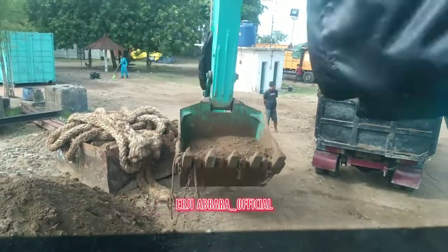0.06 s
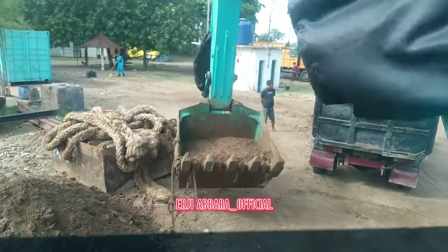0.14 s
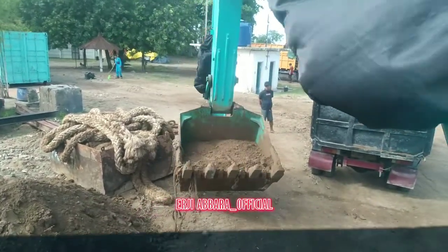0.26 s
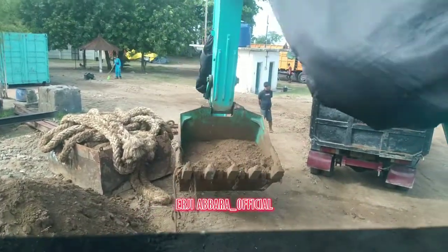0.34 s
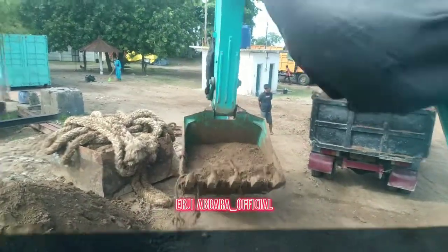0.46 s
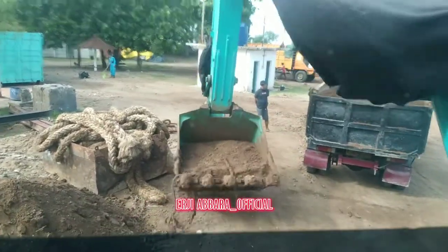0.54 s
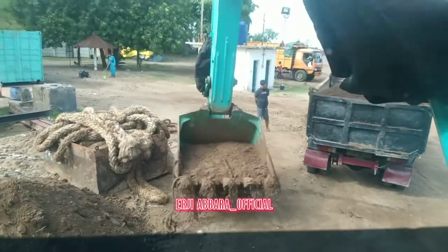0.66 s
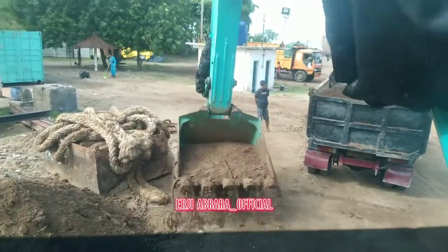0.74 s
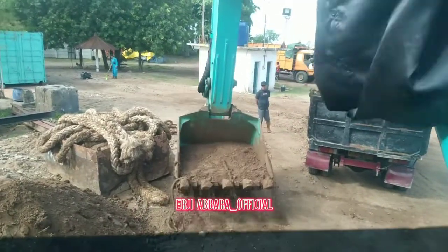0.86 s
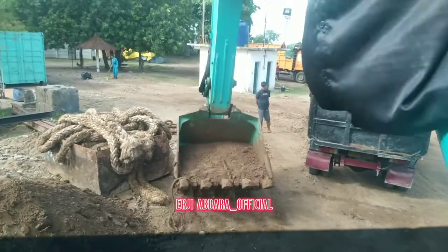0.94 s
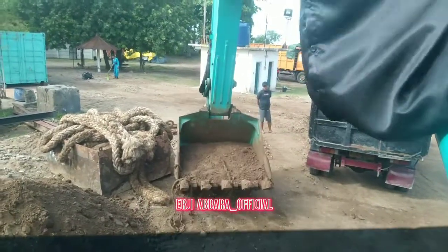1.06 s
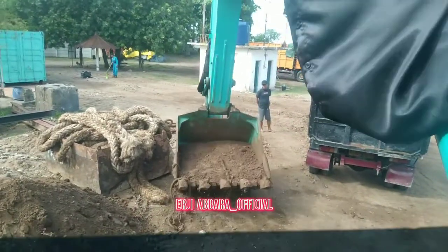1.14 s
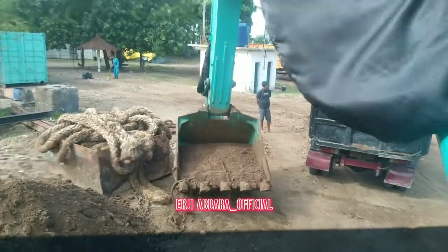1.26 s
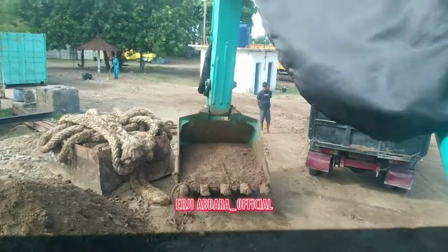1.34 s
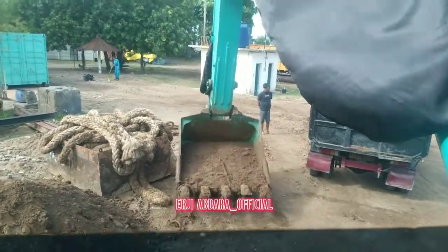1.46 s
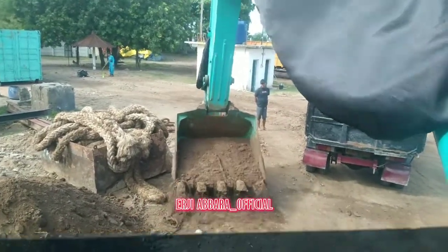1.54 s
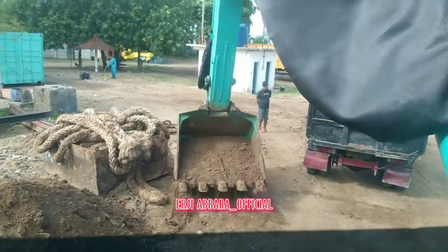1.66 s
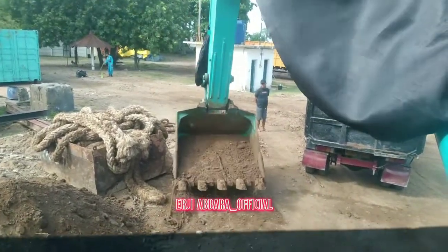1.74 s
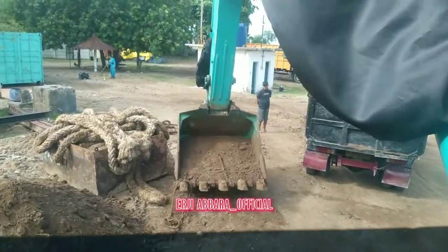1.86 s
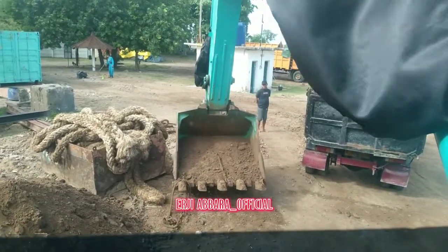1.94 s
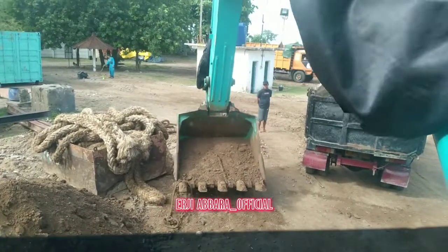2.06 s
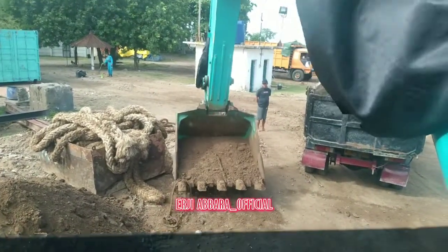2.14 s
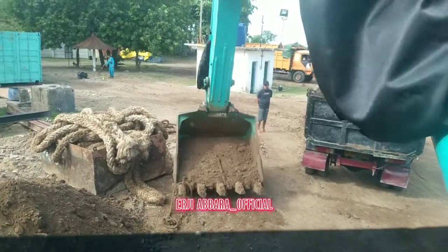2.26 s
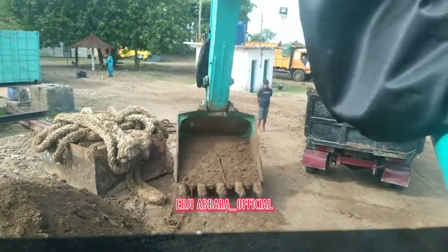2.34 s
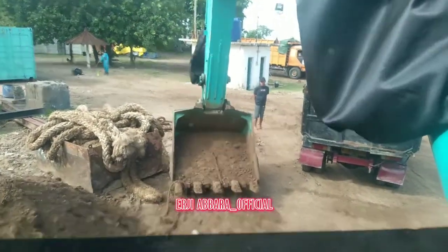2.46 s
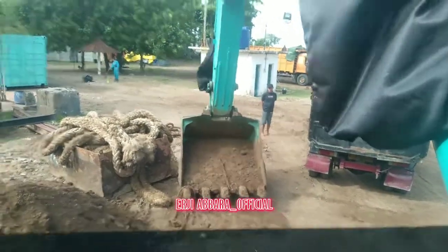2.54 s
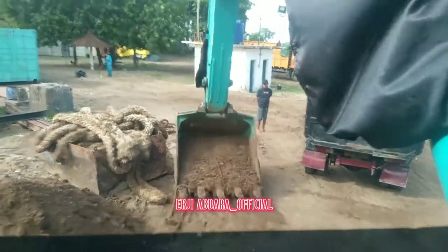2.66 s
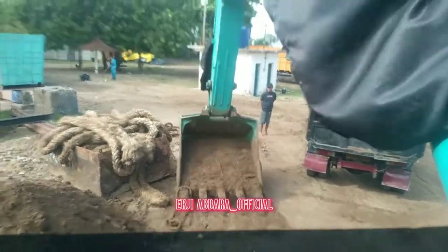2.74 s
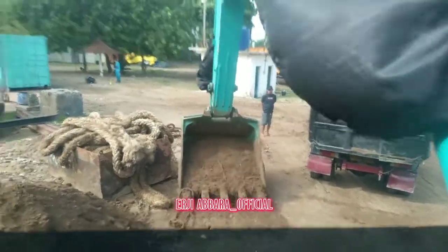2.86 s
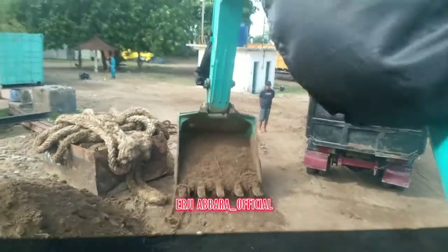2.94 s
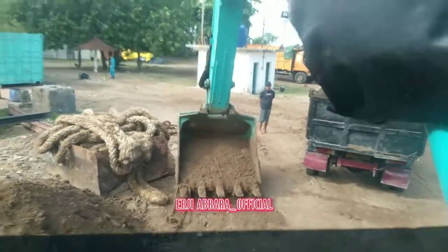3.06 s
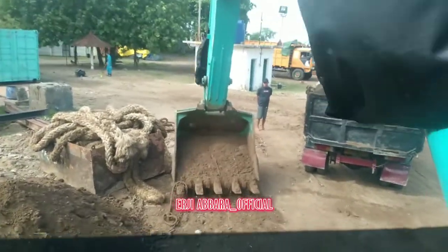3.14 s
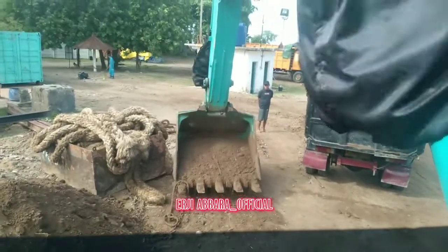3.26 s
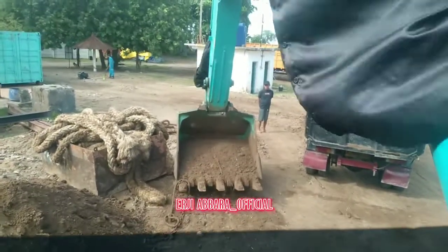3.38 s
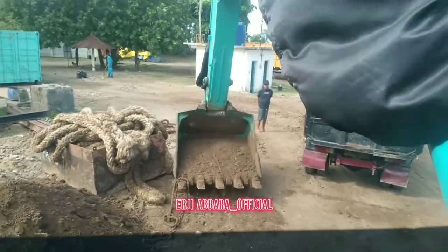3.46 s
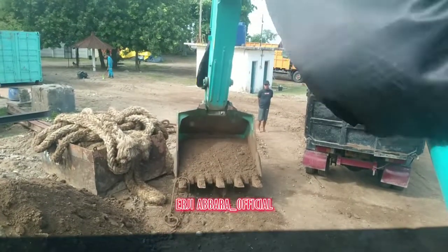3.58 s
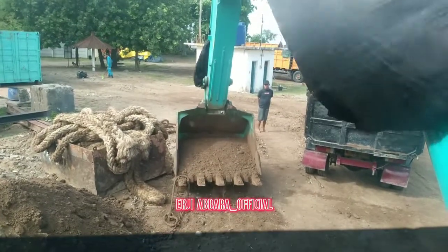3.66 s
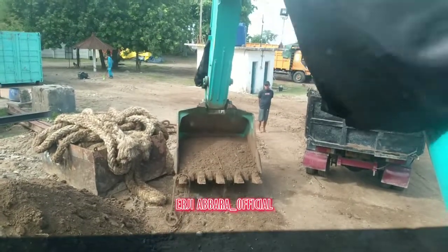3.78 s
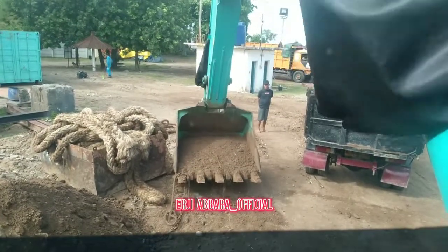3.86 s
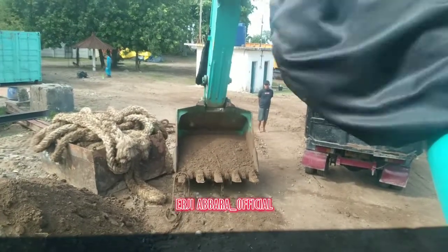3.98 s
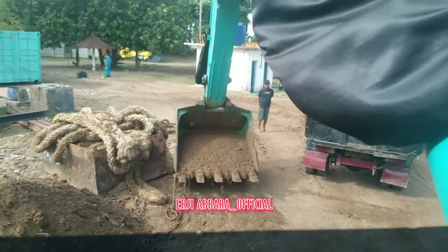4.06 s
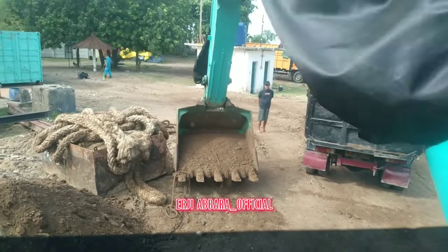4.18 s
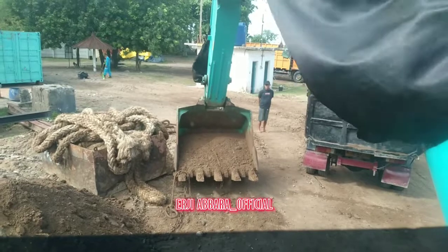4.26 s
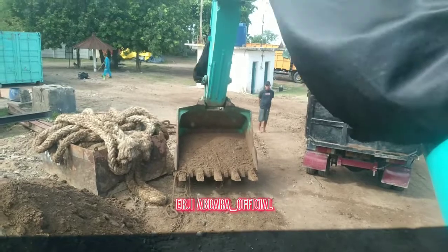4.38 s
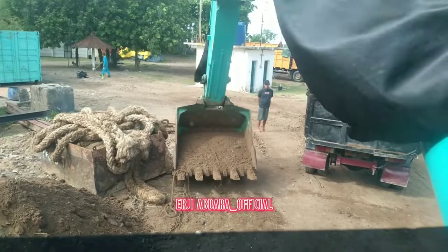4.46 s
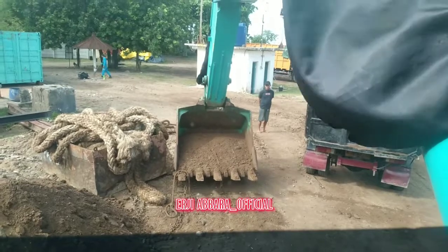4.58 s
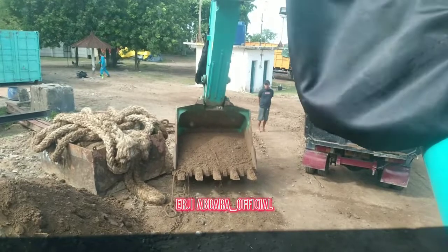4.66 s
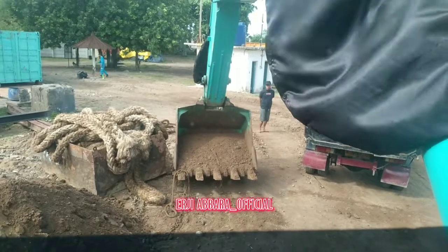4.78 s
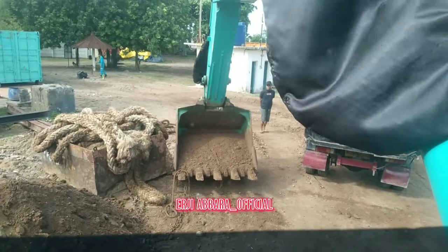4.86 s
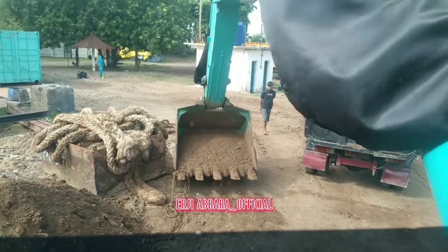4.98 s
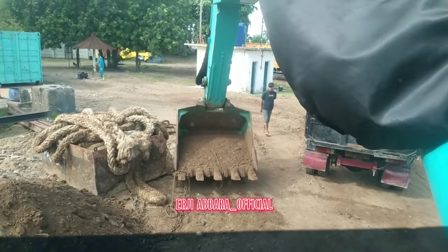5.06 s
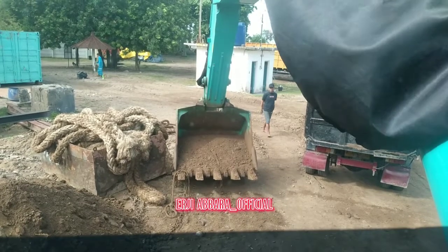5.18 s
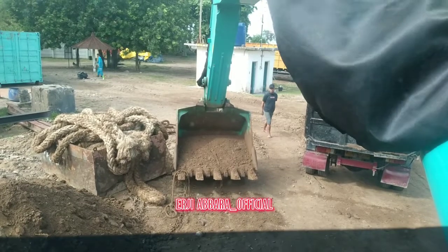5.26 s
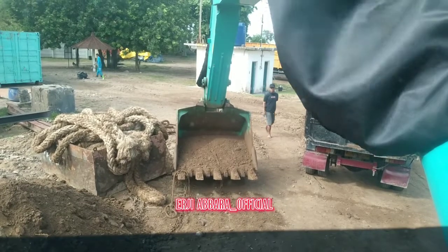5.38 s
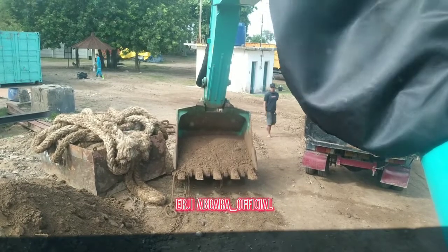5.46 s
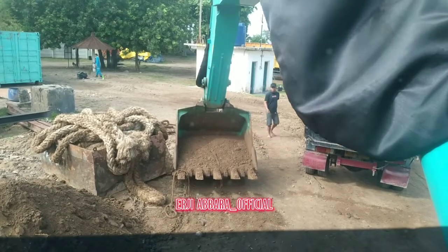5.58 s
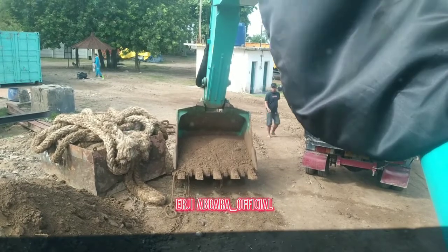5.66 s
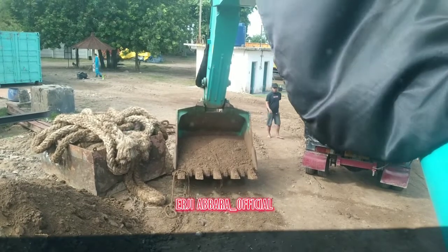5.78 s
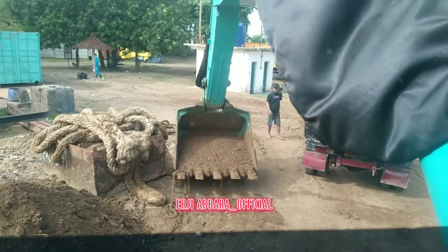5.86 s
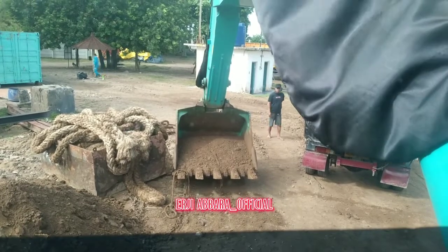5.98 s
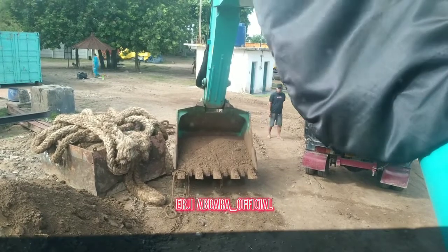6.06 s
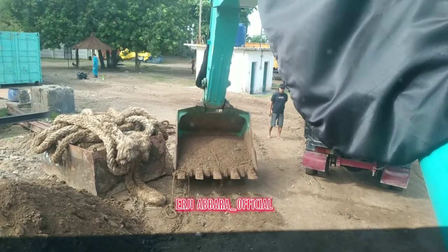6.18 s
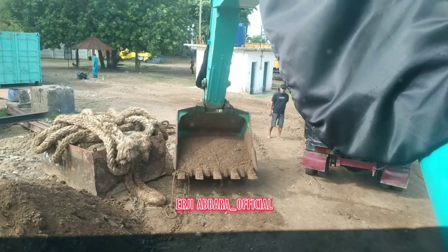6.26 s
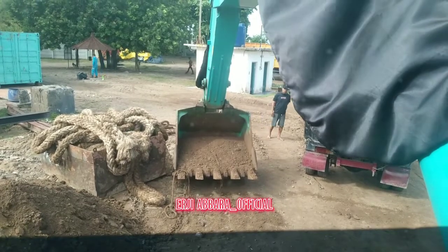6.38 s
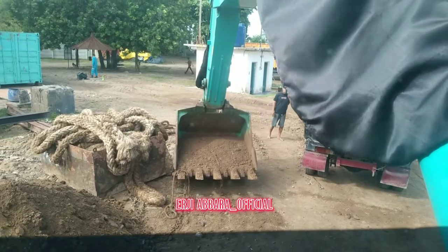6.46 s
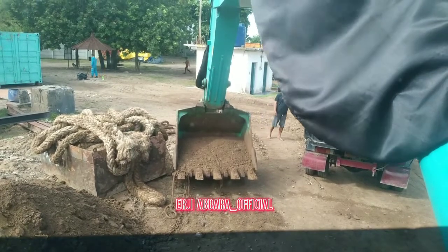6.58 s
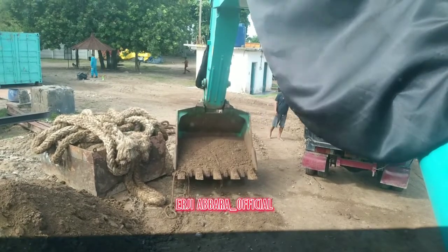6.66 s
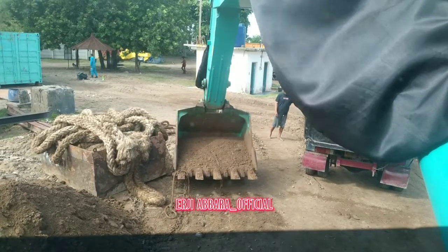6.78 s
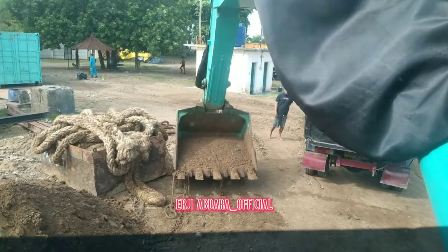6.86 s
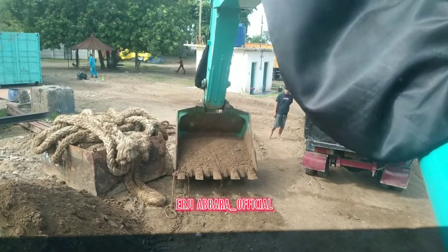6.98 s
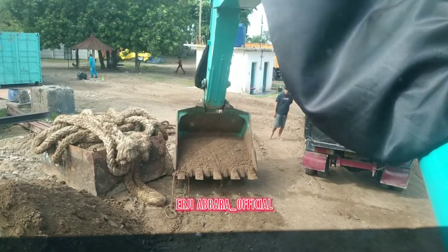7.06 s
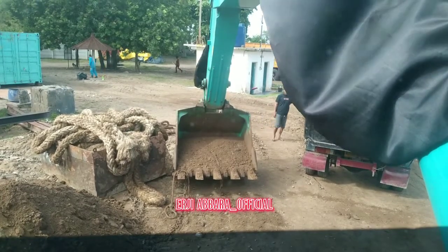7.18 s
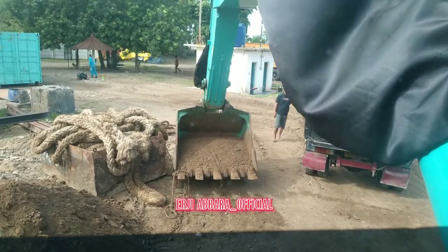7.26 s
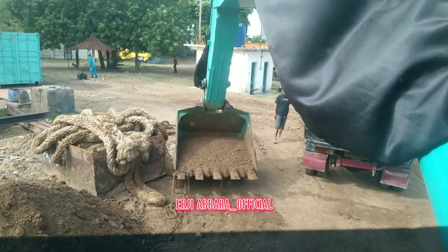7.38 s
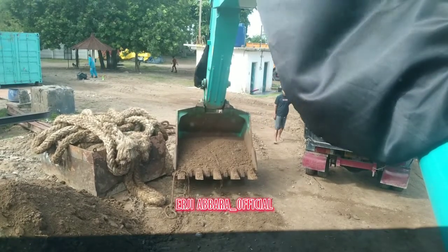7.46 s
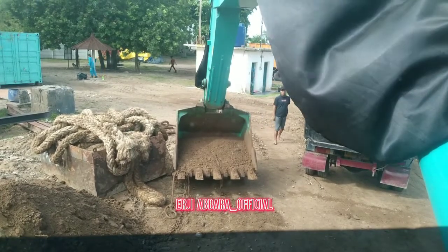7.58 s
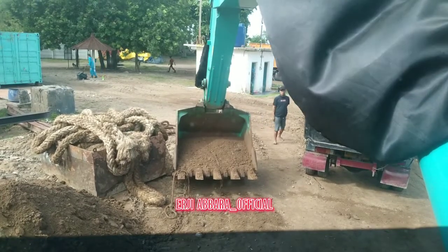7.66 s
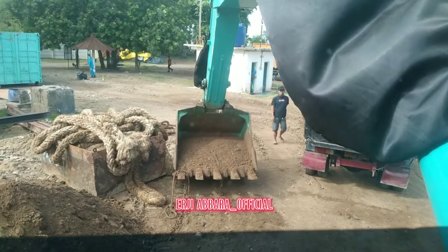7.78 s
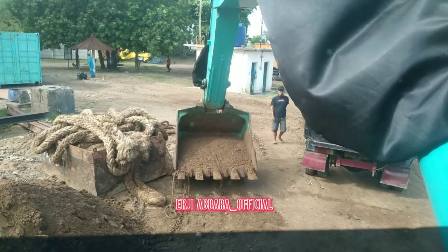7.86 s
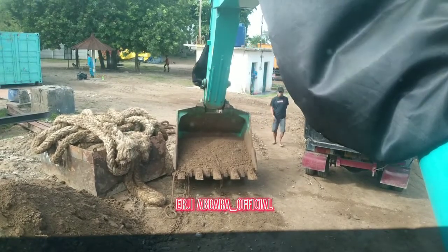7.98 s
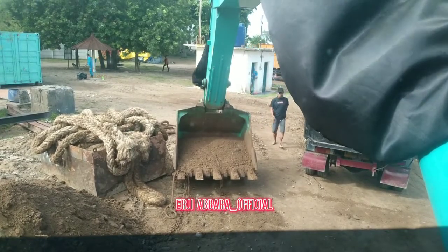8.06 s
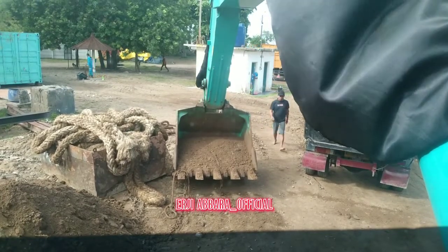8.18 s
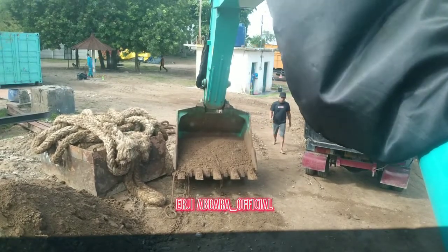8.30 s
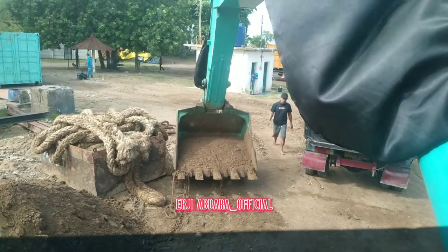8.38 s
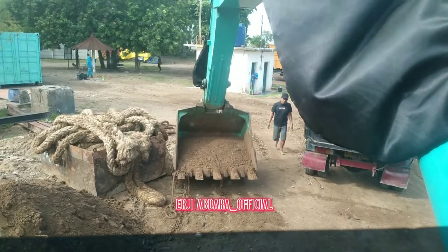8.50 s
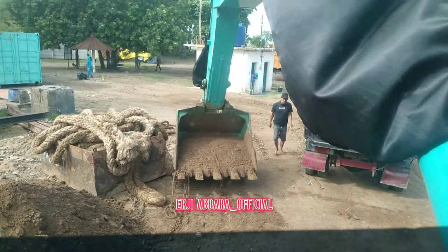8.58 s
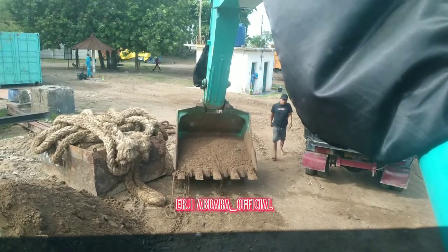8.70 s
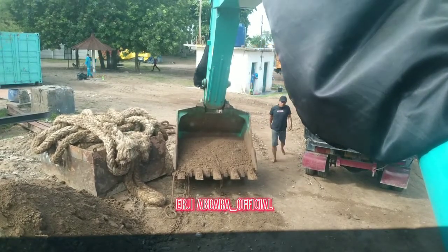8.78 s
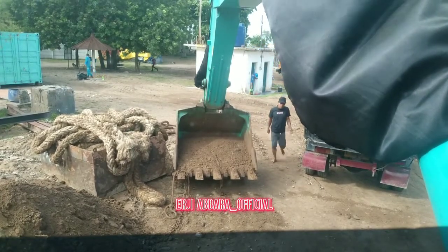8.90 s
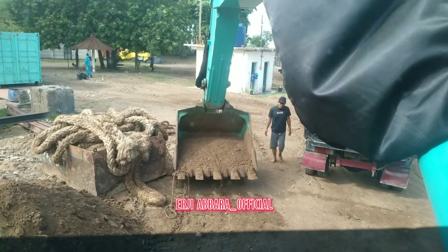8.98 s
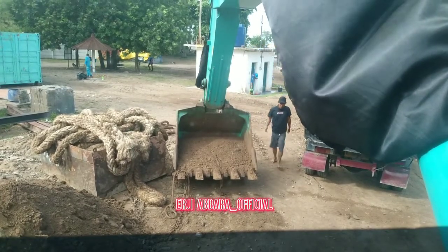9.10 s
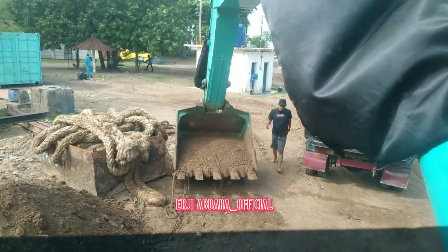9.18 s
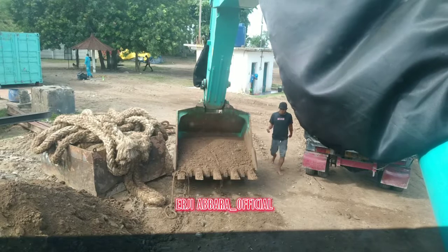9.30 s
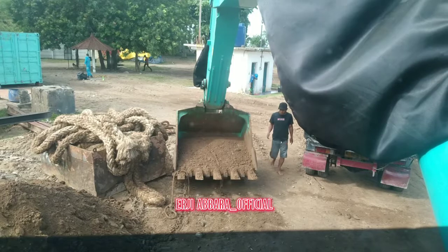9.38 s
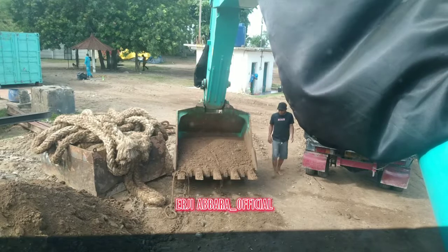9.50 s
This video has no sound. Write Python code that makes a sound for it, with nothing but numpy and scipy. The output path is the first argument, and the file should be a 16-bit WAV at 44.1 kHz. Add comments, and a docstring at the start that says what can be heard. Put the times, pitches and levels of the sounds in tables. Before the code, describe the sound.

A diesel excavator drones steadily, heard from inside its cab. For the first four seconds the machine lurches, making the cab boom and shudder while oil hisses in the valves and small fittings tick. Midway through the rocking come dull knocks, a few short lever squeaks and a thin motor whine on the left. Then it settles to an idle, with another diesel throbbing faintly outside and two soft cloth rustles.

```python
"""An excavator's diesel idles, heard in the cab: drone, crank and pump tones, and resonating panels.
The machine lurches, so the cab booms on its mounts and jolts ring the frame. Oil hisses and whistles
in the valves, a small motor whines on the left, the linkage knocks, a lever squeaks, fittings tick and
cloth rustles. Later another diesel throbs low outside. A limiter holds the loudest booms."""
import sys
import numpy as np
from scipy import signal
from scipy.io import wavfile
from scipy.ndimage import uniform_filter1d, minimum_filter1d

SR = 44100
rng = np.random.default_rng(int(sys.argv[2]) if len(sys.argv) > 2 else 0)


def dump_mix(stems):
    """Bounce the given channels to the path in sys.argv[1] as a 16-bit WAV at rate SR."""
    frames = np.atleast_2d(stems).T  # one column per channel
    limited = np.clip(frames, -1, 1)  # hard clip at full scale
    pcm = np.round(limited * 32767).astype(np.int16)
    wavfile.write(sys.argv[1], SR, pcm)


N = 420713

# standing waves of the cab at two microphones: (frequency [Hz], correlation [-1..1], left-right [dB])
CAB_FIELD = [(60, 1, -1.5), (148, 0.96, -0.5), (204, 0.63, 5), (240, 0.97, 4), (296, 0.6, 5),
             (426, -0.31, -12.5), (567, 1, -5.5), (692, -0.6, 4.5), (1010, -0.17, 0.5), (1600, -0.68, 0.5),
             (2010, 0.31, -4), (2820, -0.38, 6.5), (3400, 0.14, 0), (4600, -0.038, 3.5), (7150, -0.16, 14),
             (9700, -0.25, -25), (15000, -0.08, 5)]
# oil flow through the valves, working and then at rest: (time [s], hiss level [dB])
OIL_FLOW = [(0.0, -51.5), (0.5, -53.5), (0.76, -58), (1.25, -55.5), (1.5, -58.5), (1.8, -59), (2.08, -53),
            (2.2, -57), (2.39, -49), (2.55, -56.5), (2.68, -48), (2.85, -53), (3.5, -54.5), (3.7, -54.5),
            (4.3, -57), (4.42, -57.5), (4.6, -58.5), (5.3, -61.5), (9.54, -63)]


def from_db(db):
    """Amplitude ratio of a level in dB."""
    return 10 ** (np.asarray(db) / 20)


def unit_rms(x):
    """Normalisation: the mean of the channels gets rms 1."""
    return x / np.sqrt(np.mean(np.atleast_2d(x).mean(axis=0) ** 2) + 1e-20)


def in_time(rows, fade_s=.03):
    """Linear interpolation of each column in time, then a gate that fades outside the rows."""
    s, *columns = np.transpose(rows)
    t = np.arange(N) / SR
    gate = np.clip(np.minimum(t - s[0], s[-1] - t) / fade_s + 1, 0, 1)
    return [np.interp(t, s, c) for c in columns] + [gate]


def at_hz(points, hz, column=1):
    """Interpolation of a column on a log-frequency axis."""
    points = np.array(points)
    return np.interp(np.log(hz), np.log(points[:, 0]), points[:, column])


def pan(left_db):
    """Level difference between the channels: two gains whose mean is 1."""
    gains = from_db(np.array([[.5], [-.5]]) * left_db)
    return gains / gains.mean()


def drift(corner_hz):
    """Slow random fluctuation: low-passed noise of rms 1."""
    hop = 40
    r = np.exp(-2 * np.pi * hop * corner_hz / SR)
    slow = signal.lfilter([1], [1, -2 * r, r * r], rng.standard_normal(N // hop + 2002))[2000:]
    return np.interp(np.arange(N) / hop, np.arange(len(slow)), unit_rms(slow))


def resonance(x, hz, width_hz):
    """Damped resonator: two poles, unit gain at the peak."""
    r = np.exp(-np.pi * width_hz / SR)
    poles = [1, -2 * r * np.cos(2 * np.pi * hz / SR), r * r]
    return signal.lfilter(np.array([1, 0, -1]) * (1 - r * r) / 2, poles, x)


def cascade(x, hz, width_hz):
    """Two equal resonators in series give steeper skirts."""
    return resonance(resonance(x, hz, width_hz), hz, width_hz)


def stereo_noise(noises, hz, left_db=0):
    """Partial coherence: two noises mix to the cab's correlation and balance at this frequency."""
    alike = np.clip(at_hz(CAB_FIELD, hz), -1, 1)
    lean_db = at_hz(CAB_FIELD, hz, column=2) + left_db
    pair = np.sqrt(1 + alike) * noises[0] + np.sqrt(1 - alike) * noises[1] * [[1], [-1]]
    return pair * from_db(np.array([[.5], [-.5]]) * lean_db)


def banded_noise(spectrum, flicker_db, left_db=0):
    """Spectral shaping: third-octave bands of stereo noise, each with its own level and flicker."""
    octaves = np.log2(spectrum[-1][0] / spectrum[0][0])
    edges = spectrum[0][0] * 2 ** np.arange(0, octaves + .3, 1 / 3)
    out, together, white = 0, drift(4.2), rng.standard_normal((2, 2, N))
    for k, (low, high) in enumerate(zip(edges, edges[1:])):
        band = signal.sosfilt(signal.butter(2, [low, high], "band", fs=SR, output="sos"), white[k % 2])
        hz = np.sqrt(low * high)
        db = at_hz(spectrum, hz) + flicker_db * (.37 * together + drift(20.4))
        out = out + from_db(db) * stereo_noise(band, hz, left_db)
    return unit_rms(out)


def sine(hz):
    """Sinusoid of rms 1 whose phase is the integral of its frequency."""
    return np.sqrt(2) * np.sin(2 * np.pi * (np.cumsum(hz * np.ones(N)) / SR + rng.random()))


def burst(s, db, t60, front):
    """Impact excitation: its place in time, and noise with a crisp front and an exponential tail."""
    t, at = np.arange(SR // 5) / SR, round(s * SR)
    shape = from_db(-60 * t / t60) + front * from_db(-60 * t / .008)
    return np.s_[:, at:at + len(t)], from_db(db) * shape * rng.standard_normal((2, len(t)))


def evened(x, samples):
    """Envelope flattening: division by the running rms evens out the swells of a noise."""
    return x / np.sqrt(uniform_filter1d(x.mean(axis=0) ** 2, size=samples) + .021)


def jolt_swell(s, rise_s=.016, fall_s=.026):
    """Skewed Gaussian envelope: a quick swell and a slower fall around one jolt."""
    late = np.arange(N) / SR - s
    return np.exp(-.5 * (late / np.where(late < 0, rise_s, fall_s)) ** 2)


def tone_colour(x):
    """Frequency response of cab and microphone: midrange resonances, treble peaks and dips."""
    # tone colour of cab and microphone: (frequency [Hz], width [Hz], gain [dB])
    peaks_and_dips = [(162.5, 15.4, -8.5), (1550, 83, -2), (1640, 140, 3.5), (2140, 610, 2),
                      (2693, 180, 4.5), (2830, 140, -1), (3230, 240, 1.5), (7160, 880, 7.5),
                      (8500, 3200, -6), (10740, 810, 5), (12700, 2500, -16)]
    for hz, width_hz, db in peaks_and_dips:
        x = x + (from_db(db) - 1) * resonance(x, hz, width_hz)
    return x


def far_diesel(low_hz=30.1):
    """Transmission loss: only the lowest exhaust tones of a diesel outside pass the cab walls."""
    # lower exhaust tone: (time [s], level [dB])
    low_tone = [(4.7, -25), (5.2, -25.5), (5.99, -19), (6.1, -31), (6.46, -26), (6.95, -44), (7.65, -42),
                (7.9, -36), (8.7, -36), (9.05, -27), (9.54, -29)]
    # higher exhaust tone: (time [s], frequency [Hz], level [dB])
    high_tone = [(6.95, 51.1, -39), (7.1, 48.7, -28), (7.45, 50, -26), (7.65, 51.5, -32), (8.3, 53.5, -26),
                 (8.8, 53.9, -26.5), (8.95, 57.6, -38), (9.54, 59.9, -35)]
    low_db, low_gate = in_time(low_tone, fade_s=.084)
    high_hz, high_db, high_gate = in_time(high_tone, fade_s=.084)
    low = low_gate * from_db(low_db) * sine(low_hz)
    high = high_gate * from_db(high_db) * sine(high_hz)
    return (low + high) * pan(-1.5)


def hiss_and_rustles(snaps_per_s=3000, fade_s=.022):
    """Shot noise: clumps of tiny snaps make soft swells of high hiss, and the rustles of cloth."""
    # swells of high hiss, and cloth rustles: (start [s], peak time [s], level [dB], centre [Hz])
    swells = [(0.0, 0.25, -63, 10500), (1.06, 1.24, -64, 10500), (1.17, 1.283, -56, 6500),
              (1.86, 1.925, -56, 6000), (2.09, 2.135, -62, 5400), (7.306, 7.397, -47.5, 5000),
              (8.223, 8.272, -53, 5960)]
    out, t = 0, np.arange(N) / SR
    clumps = from_db(2.5 * drift(70))
    snapped = rng.random((2, N)) < snaps_per_s * clumps / SR
    sizes = from_db(4 * np.minimum(rng.exponential(1, N), 2.5))
    snaps = unit_rms(snapped * sizes * rng.standard_normal((2, N)))
    sheen = .4 * cascade(snaps, 9100, 5000)
    for start, peak, db, hz in swells:
        rise = np.interp(t, [start, start + .02, peak], [0, .5, 1])
        fall = np.exp(-np.clip(t - peak, 0, None) / fade_s)
        out = out + from_db(db) * rise * fall * unit_rms(resonance(snaps, hz, 2700) + sheen)
    return out


def valve_whistle():
    """Modulation: low-passed noise times a gliding tone gives a narrow, breathy band."""
    # whistle of a valve: (time [s], frequency [Hz], level [dB])
    glide = [(4.25, 5230, -74), (4.4, 5250, -54), (4.55, 5240, -63), (4.7, 5100, -76)]
    hz, db, gate = in_time(glide)
    breath = signal.lfilter([1], [1, -np.exp(-2 * np.pi * 150 / SR)], rng.standard_normal((2, N)))
    return gate * from_db(db) * unit_rms(breath * sine(hz))


def fittings(t60=.048, peak_rattles_per_s=40, rattle_db=-55):
    """Impacts excite plastic resonances; faint random rattles come more often as oil flows harder."""
    # ticks of the fittings: (time [s], level [dB], left-right [dB], brightness [dB])
    ticks = [(0.3057, -40, -1, -5), (0.329, -46, 0, -2), (0.3381, -36, 3, -14), (0.423, -35, -8, -5),
             (0.4274, -33, 3.5, -10), (0.4564, -31, -2, -10), (0.4978, -40, -3, -2), (1.1423, -42, 0, -4),
             (1.3444, -49, 4.5, 0), (1.4311, -41, 4, -18), (1.612, -38, 9.5, -18), (1.917, -36, 4, -14),
             (2.1236, -36, 6, -12), (2.152, -43, 4, -18), (2.388, -42, 0, -6), (2.4654, -34, 7.5, -16),
             (2.4875, -31, 11, -6), (2.5357, -39, 8, -16), (5.665, -39, 2, -4), (7.3323, -43, 0, -8),
             (7.365, -41, 0, -6), (7.387, -34, 0, -12), (8.2554, -47, 0, 0), (8.2592, -42, 0, -16),
             (8.2778, -35, -5, -5), (8.559, -40, -5, -5)]
    out = np.zeros((2, N))
    for s, db, left_db, bright_db in ticks:
        where, noise = burst(s, db - 3.5, t60, front=1.5)
        body = 1.3 * cascade(noise, 7400, 2000) + 1.2 * cascade(noise, 4600, 3500)
        top = 1.4 * from_db(bright_db) * cascade(noise, 10600, 3000)
        out[where] += body * pan(left_db) + top * pan(left_db - 20)   # the top lies further right
    hiss_db, _ = in_time(OIL_FLOW)
    struck = rng.random(N) < peak_rattles_per_s * from_db(4 * (hiss_db - hiss_db.max())) / SR
    sizes = from_db(rattle_db + 4 * np.minimum(rng.exponential(1, N), 3))
    decays = signal.lfilter([1], [1, -from_db(-60 / (t60 * SR))], struck * sizes + 1e-18)
    rattle = decays * rng.standard_normal((2, N))
    out += resonance(rattle, 7000, 3000) + .5 * resonance(rattle, 10500, 2500)
    return signal.sosfilt(signal.butter(4, 13300, fs=SR, output="sos"), out)


def lever():
    """Friction-excited vibration: a brief dry rub locks onto the lever's modes, which then ring out."""
    # squeaks: (time [s], level [dB], rubbing time [s], gain above 5 kHz [dB])
    squeaks = [(2.434, -28.5, 0.019, 2.5), (2.757, -31.5, 0.0092, 1), (3.03, -45, 0.011, 0)]
    # modes of the lever: (frequency [Hz], level [dB], t60 [s], left-right [dB])
    modes = [(3514, -3, 0.05, 6), (6050, -23, .05, 10), (3880, -22, .03, 10), (6860, -21, 0.18, 8),
             (7350, -17, .05, 16), (11500, -26, .03, -12)]
    out, t = np.zeros((2, N)), np.arange(SR // 4) / SR
    for s, db, rub_s, overtone_db in squeaks:
        at = round(s * SR)
        for hz, mode_db, t60, left_db in modes:
            swell = np.clip(t / .0055, 0, 1) * from_db(-60 * np.clip(t - rub_s, 0, 1) / t60)
            grip = from_db(2.5 * drift(80)[:len(t)] + overtone_db * (hz > 5000))
            ring = from_db(db + mode_db) * grip * swell * np.sin(2 * np.pi * hz * t)
            out[:, at:at + len(t)] += ring * pan(left_db)
    return out


def linkage():
    """Impacts in the linkage drive steel and panel resonances with dull, crackling bursts."""
    # knocks: (time [s], level [dB])
    knocks = [(2.053, -22), (2.104, -23), (2.128, -27), (2.2926, -26), (2.384, -28), (2.615, -26),
              (2.665, -24), (2.711, -30), (3.0294, -31)]
    out, crackle = np.zeros((2, N)), from_db(2.5 * drift(120))
    for s, db in knocks:
        where, noise = burst(s, db - 1.5, t60=.11, front=0)
        noise = noise * crackle[where[1]]
        body = resonance(noise, 1300, 500) + .8 * resonance(noise, 2500, 1000)
        out[where] += body + .12 * resonance(noise, 4200, 1800)
    return signal.sosfilt(signal.butter(4, 5200, fs=SR, output="sos"), out)


def small_motor(on_s=2.65, off_s=3.515, contact_hz=211.6, sag_hz_per_s=12.7):
    """Periodic contacts give a harmonic series that runs up, then sags; air rushes at start and stop."""
    # spectral envelope of the whine: (frequency [Hz], level [dB])
    spectrum = [(800, -4), (2200, -4), (3200, -9), (4000, -14), (4700, -10), (5300, -18), (5900, -9),
                (7000, -10), (8500, -11), (8700, -24), (9600, -21), (10500, -17), (15500, -29)]
    # harmonics with a level of their own: {harmonic number: level [dB]}
    prominent = {5: 2, 7: 2, 9: 3, 11: -11, 12: 4, 14: -11, 27: -7, 28: -8, 30: 0, 31: -1, 32: -5, 33: 0,
                 35: -2, 36: -2, 39: -3, 43: -11, 44: -14, 51: -13}
    # balance of the whine: (frequency [Hz], left-right [dB])
    balance = [(800, 6), (1500, 14), (4000, 12), (6200, 27), (8300, 26), (9700, 0), (10700, 0), (13000, 10),
               (15000, 16)]
    # rush of air: (time [s], level [dB])
    air_rush = [(2.52, -64), (2.56, -49), (2.66, -48), (2.72, -58), (2.8, -64), (3.47, -60), (3.52, -51),
                (3.62, -57), (3.7, -71)]
    gate, = in_time([(on_s,), (off_s,)], fade_s=.0092)
    on = gate > 0
    running_s = np.clip(np.arange(N)[on] / SR - on_s, 0, None)
    shortfall_hz = 42 * np.exp(-(running_s / .073) ** 1.3)   # below speed during the run-up
    cycles = np.cumsum(contact_hz - sag_hz_per_s * running_s - shortfall_hz) / SR
    flicker_db = [1.2 * drift(14)[on] for _ in range(6)]
    whine = np.zeros((2, N))
    for harmonic in range(4, 76):
        hz = harmonic * contact_hz
        db = prominent.get(harmonic, at_hz(spectrum, hz) + 2 * rng.standard_normal())
        gain = from_db(db - .4 * shortfall_hz + flicker_db[harmonic % 6])
        partial = np.sin(2 * np.pi * (harmonic * cycles + rng.random()))
        whine[:, on] += gain * partial * pan(at_hz(balance, hz))
    # the housing sings while the motor is below speed
    whine[:, on] += .34 * shortfall_hz * cascade(whine[:, on], 6700, 700)
    rush_db, rush_gate = in_time(air_rush)
    rush = unit_rms(resonance(resonance(rng.standard_normal(N), 7400, 800), 6050, 800))
    return gate * from_db(-52) * whine + rush_gate * from_db(rush_db) * rush * pan(31)


def hydraulics(spot_lag_s=.00093):
    """Flow noise: oil roars through the valves, and the hiss above it crackles more as it swells."""
    # spectra of the hiss and the roar: (frequency [Hz], relative spectral density [dB])
    hiss_spectrum = [(2060, -27.5), (3500, -7), (4460, -5), (5180, 0.5), (5800, -11), (7030, -7.5),
                     (8110, -22), (10600, -13.5), (15500, -30)]
    roar_spectrum = [(600, -2), (1000, 2), (2000, -3), (3300, -2.5), (5000, -14.5), (7000, -44)]
    hiss_db, _ = in_time(OIL_FLOW)
    crackle_db = .13 * (hiss_db - hiss_db.min()) * drift(150)
    hiss = from_db(hiss_db + crackle_db) * banded_noise(hiss_spectrum, flicker_db=1, left_db=3)
    # part of the roar comes from one spot and reaches the left microphone later
    spot = unit_rms(cascade(rng.standard_normal(N), 2050, 1500))
    spot_pair = np.array([np.roll(spot, round(spot_lag_s * SR)), spot])
    roar = banded_noise(roar_spectrum, flicker_db=.4) + from_db(-4) * spot_pair
    roar_db = -18.5 + .53 * hiss_db   # swings about half as far as the hiss
    return from_db(roar_db) * roar + hiss


def lurching():
    """A mass on springs: the rocking cab booms and shudders; jolts excite frame, floor and panels."""
    # rocking of the cab on its mounts: (time [s], boom level [dB])
    rocking = [(0.0, -25), (0.18, -26.5), (0.5, -7), (0.74, -13.5), (0.82, -18.5), (1.0, -28), (1.2, -13),
               (1.4, -11.5), (1.7, -17.5), (2.25, -15), (2.37, -6.5), (2.7, -6.5), (2.9, -9), (3.08, -6),
               (3.3, -12), (3.45, -18.5), (3.7, -28.5), (3.92, -19.5), (4.0, -8.5), (4.3, -19.5),
               (4.7, -26)]
    # spectra of the boom and the shudder: (frequency [Hz], relative spectral density [dB])
    boom_spectrum = [(5.9, -38), (10, 8.5), (27, 8.5), (60, -7), (80, -12.5), (100, -12), (180, -120)]
    shudder_spectrum = [(45, -44), (60, -12), (105, 1.5), (130, -6), (165, -24), (330, -23.5), (600, -30.5)]
    # jolts: (time [s], frame ring level [dB], floor plate level [dB], ring frequency [Hz])
    jolts = [(0.05, -35, -22.5, 101), (0.29, -17, -30, 110.2), (0.405, -18, -26, 100.5),
             (0.479, -6.5, -16.5, 113), (0.59, -16, -26, 125), (1.21, -15.5, -26, 89.1),
             (1.39, -16, -33, 99.8), (2.03, -15, -23.5, 106.4), (2.345, -14, -16, 80),
             (2.48, -15, -29, 62.1), (2.555, -17, -26, 130), (2.7, -27, -16.5, 98.5),
             (2.655, -9, -28, 98.1), (2.728, -10.5, -23.5, 112), (2.84, -13.5, -26, 101.6),
             (3.055, -11, -28, 109.6), (3.16, -13, -34, 100), (3.97, -17.5, -28, 90.5)]
    boom_db, gate = in_time(rocking, fade_s=.13)
    frame_db = -12 + .73 * boom_db   # the frame follows part of the rocking
    boom = from_db(boom_db) * evened(banded_noise(boom_spectrum, flicker_db=-1.5), samples=3500)
    shudder = from_db(frame_db) * evened(banded_noise(shudder_spectrum, flicker_db=3.5), samples=1800)
    wavering = 1 + .05 * drift(15)
    rings = sum(from_db(db) * jolt_swell(s) * sine(hz * wavering) for s, db, _, hz in jolts) * pan(-2.1)
    plate = cascade(rng.standard_normal((2, N)), 219.5, 67)
    plate = evened(unit_rms(stereo_noise(plate, 217)), samples=1800)
    jolt_power = sum((from_db(db) * jolt_swell(s)) ** 2 for s, _, db, _ in jolts)
    drumming = np.sqrt(from_db(frame_db - 11.5) ** 2 + jolt_power) * plate
    white = rng.standard_normal((2, N))
    panels = unit_rms(cascade(white, 520, 450) + .5 * resonance(resonance(white, 1020, 600), 1270, 600))
    slaps = sum(from_db(db - 18) * jolt_swell(s) ** 2 for s, _, db, _ in jolts) * panels
    return gate * (boom + shudder + rings + slaps + drumming)


def engine(crank_hz=15.468, sag_per_db=.0003):
    """Forced vibration: a drone, resonating panels and tones locked to a crank that hunts and sags."""
    # spectrum of the drone: (frequency [Hz], relative spectral density [dB])
    drone_spectrum = [(8.2, -28), (14, 1), (37, -1.5), (59, -6.5), (91, -8.5), (116, -2.5), (151, 0),
                      (174, -2.5), (227, -9), (271, -10), (616, -25.5), (801, -25), (2670, -35),
                      (10600, -68.5), (15500, -90)]
    # cab panel resonances: (frequency [Hz], width [Hz], level [dB])
    panel_modes = [(93.6, 51, -28.5), (222, 56.5, -30.5), (407, 92, -38.5), (556.7, 84, -40),
                   (614.6, 31, -45.5), (743.6, 46, -53)]
    # engine and pump tones: (order [multiple of the crank rate], level [dB])
    orders = [(5, -39), (6, -35), (8, -40), (9, -34), (9.6, -25), (11, -43), (12, -40), (15, -41),
              (18, -48), (20, -44), (21, -42), (24, -51), (26, -53), (27, -53), (29, -49), (30, -54),
              (36, -50), (39, -52), (42, -57), (48, -52), (67.2, -60), (87, -67), (108, -68)]
    out = from_db(-24) * banded_noise(drone_spectrum, flicker_db=1.82)
    for hz, width_hz, db in panel_modes:
        shaken = cascade(rng.standard_normal((2, N)), hz, width_hz)
        out += from_db(db) * unit_rms(stereo_noise(shaken, hz))
    hiss_db, _ = in_time(OIL_FLOW)
    load_db = hiss_db - hiss_db.min()
    speed_hz = crank_hz * (1 - sag_per_db * load_db + .0007 * drift(1.5))
    wavering = [from_db(drift(3.5)) for _ in range(4)]
    for k, (order, db) in enumerate(orders):
        left_db = at_hz(CAB_FIELD, order * crank_hz, column=2)
        out += from_db(db) * wavering[k % 4] * sine(order * speed_hz) * pan(left_db)
    return out


def scene():
    """Superposition of all sources, the first five with the tone colour of cab and microphone."""
    coloured = tone_colour(engine() + lurching() + hydraulics() + linkage() + hiss_and_rustles())
    return coloured + small_motor() + far_diesel() + lever() + fittings() + valve_whistle()


def record(dry):
    """Look-ahead limiting over a few milliseconds holds peaks at full scale; a low-pass cuts the top."""
    allowed_gain = 1 / np.maximum(np.abs(dry).max(axis=0), 1)
    gain = uniform_filter1d(minimum_filter1d(allowed_gain, size=221), size=221)
    return signal.sosfilt(signal.ellip(10, .5, 70, 15510, fs=SR, output="sos"), dry * gain)


dry = scene()
out = record(dry)
dump_mix(out)
```